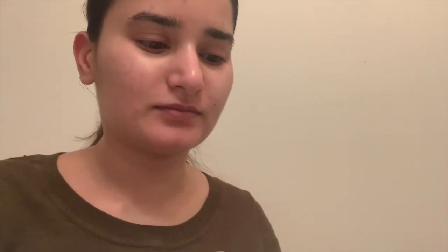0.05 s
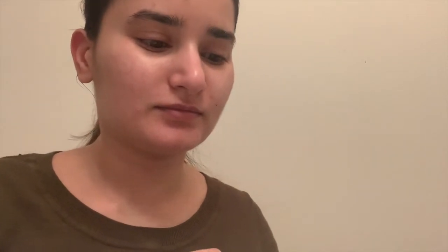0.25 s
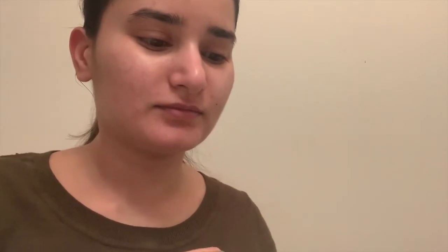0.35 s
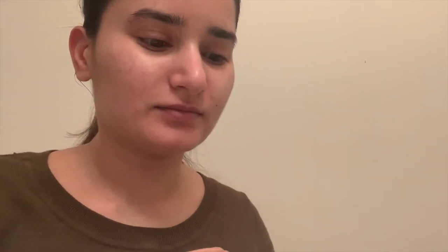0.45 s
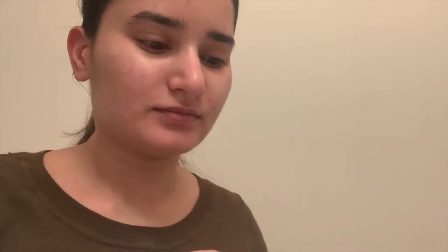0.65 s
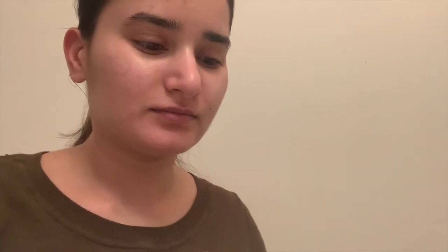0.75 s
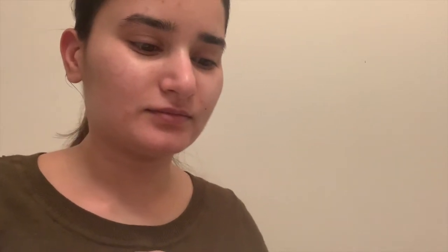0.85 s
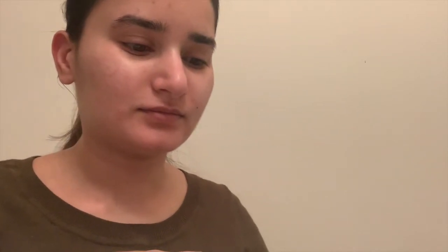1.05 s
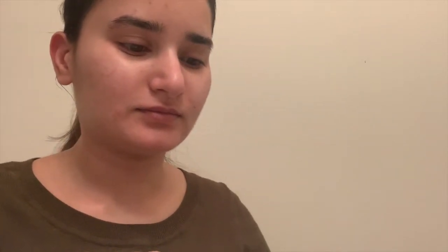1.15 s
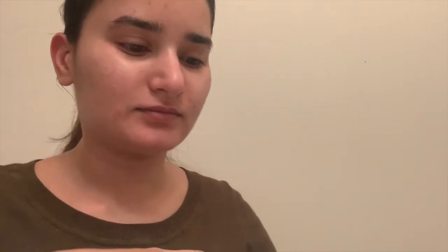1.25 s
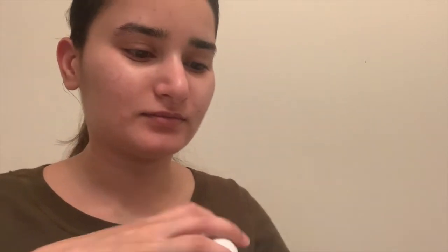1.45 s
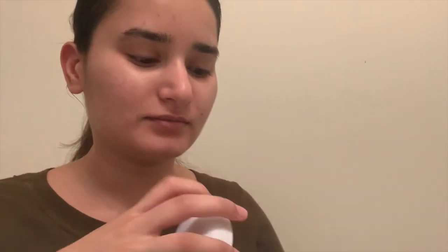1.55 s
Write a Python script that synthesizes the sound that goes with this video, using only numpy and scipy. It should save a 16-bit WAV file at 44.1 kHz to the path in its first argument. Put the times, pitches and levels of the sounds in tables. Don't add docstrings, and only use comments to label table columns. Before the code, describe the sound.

Small cosmetic jar handled close to the microphone: brief hard lid clacks with a short glassy ring, dull palm bumps, gritty thread scraping, then a light hand slide and weak taps, with faint room hiss.

```python
import sys
import numpy as np
from scipy import signal
from scipy.fft import rfft, irfft
from scipy.io import wavfile
rng = np.random.default_rng(int(sys.argv[2]) if len(sys.argv) > 2 else 0)


def amp(db):
    return 10 ** (np.asarray(db, float) / 20)


def write(x):
    x = np.atleast_2d(x).T
    wavfile.write(sys.argv[1], SR, np.round(np.clip(x, -1, 1) * 32767).astype(np.int16))

SR = 44100


N = 70560


def rms_one(x):
    return x / np.sqrt(np.mean(x ** 2) + 1e-20)


def in_time(rows):
    return amp(np.interp(np.arange(N) / SR, *np.transpose(rows)))


def colour(x, points):
    hz, db = np.transpose(points)
    bins_hz = np.arange(N // 2 + 1) * SR / N + 1
    gain = amp(np.interp(np.log(bins_hz), np.log(hz), db))
    return irfft(rfft(x) * gain, N)


def high_pass(x, hz, order):
    return signal.sosfilt(signal.butter(order, hz, "high", fs=SR, output="sos"), x)


def ring(x, hz, t60):
    r = amp(-60 / (t60 * SR))
    w = 2 * np.pi * hz / SR
    return signal.lfilter([0, np.sin(w)], [1, -2 * r * np.cos(w), r * r], x + 1e-18)


def resonance(x, hz, width_hz):
    r = np.exp(-np.pi * width_hz / SR)
    feedback = [1, -2 * r * np.cos(2 * np.pi * hz / SR), r * r]
    return signal.lfilter(np.array([1, 0, -1]) * (1 - r * r) / 2, feedback, x)


def grains(per_s, size_db):
    sizes = amp(size_db * np.minimum(rng.exponential(1, N), 5)) * rng.choice([-1, 1], N)
    return sizes * (rng.random(N) < per_s / SR)


def lid_knocks():
    knock_s = [.21, .2519, .252, .2522, .2928, .2944, .3163, .3162, .3172, .3163, .3185, .4623, .5056,
               .5108, .5112, .5116, .5119, .5124, .5122, .5134, .5151, .516, 1.156, 1.157, 1.165, 1.193,
               1.1931, 1.1931, 1.1933, 1.1933, 1.1935]
    # peak_db [dB], ring_hz [Hz], ring_t60_s [s], crack_db [dB]
    knock_rows = [(-44.5, 5100, 0.0093, -62.5), (-21.5, 1423, 0.0161, -31.5), (-26.5, 5400, 0.0135, -34),
                  (-27, 9520, 0.0085, -47.5), (-22.5, 1305, 0.024, -61.5), (-26.5, 1232, 0.0128, -61.5),
                  (-14, 1954, 0.0055, -29), (-16, 6040, 0.0071, -34.5), (-21.5, 5700, 0.0121, -46),
                  (-22.5, 14000, 0.0036, -46.5), (-17.5, 939, 0.0215, -47.5), (-33.5, 1184, 0.0235, -46.5),
                  (-20, 800, 0.0101, -27), (-19.5, 2310, 0.0052, -38.5), (-23.5, 5450, 0.013, -55.5),
                  (-6.5, 1954, .006, -29.5), (-12.5, 1335, 0.00358, -50.5), (-20.5, 4114, 0.00614, -35),
                  (-27.5, 715, 0.0079, -41), (-16, 1149, 0.0131, -25.5), (-16.5, 1227, 0.0125, -46.5),
                  (-12.5, 1360, 0.0063, -57), (-31, 1220, 0.0079, -42), (-35, 668, 0.0082, -54),
                  (-40.5, 4960, 0.0102, -62.5), (-28, 5412, 0.0118, -50.5), (-43, 4870, 0.0061, -55.5),
                  (-31, 3416, 0.0082, -55.5), (-33.5, 754, 0.0042, -52), (-29, 860, 0.0062, -61.5),
                  (-22.5, 1302, 0.0124, -44.5)]
    # pitch_hz [Hz], level_db [dB]
    crack_colour = [(600, 5), (2000, 6), (3500, 2), (5700, -6), (7500, -8.5), (10000, -10.5), (15500, -14)]
    crack_rise_s, crack_t60_s = 0.0002, 0.0183
    t = np.arange(N) / SR
    rings, crack = np.zeros(N), np.zeros(N)
    for s, (db, hz, t60, crack_db) in zip(knock_s, knock_rows):
        push_s = max(0.2 / hz, 1 / SR)
        push = np.maximum(1 - np.abs(t - s) / push_s, 0)
        rings += ring(amp(db) / (push_s * SR) * push, hz, t60)
        rise = np.clip((t - s) / crack_rise_s + 1, 0, 1)
        crack += rise * amp(crack_db - 60 * np.maximum(t - s, 0) / crack_t60_s)
    return rings + crack * rms_one(colour(rng.standard_normal(N), crack_colour))


def jar_ringing():
    strike_s = [.2528, .3164, .5115, 1.193]
    # level_db [dB], treble_tilt_db [dB per 5 kHz], wall_modes_db [dB]
    strike_rows = [
        (-33.5, 8, -17),
        (-34, -1, -1.5),
        (-21.5, -7.5, -1.5),
        (-48, 16.5, -13.5),
    ]
    # pitch_hz [Hz], level_db [dB], t60_s [s]
    jar_modes = [(708.2, -17.5, 0.11), (1088.4, -12.5, 0.34), (1131, -17, 0.051), (1224, -18.5, 0.055),
                 (1281.3, -15, 0.16), (2170, -44, 0.052), (2508.2, -5.5, 0.0279), (3331, -7.5, 0.047),
                 (3372, -13, 0.18), (3490, -7, 0.057), (4774, -14.5, 0.095), (5560, -17, 0.016),
                 (5630, -16, 0.0097)]
    chatter_db, chatter_t60_s, chatter_knee_hz = -20, 0.3, 2500
    held_t60_s, wall_from_hz, spread_db = 0.08, 3000, -1.5
    t = np.arange(N) / SR
    out = np.zeros(N)
    spread = rng.standard_normal((len(strike_rows), len(jar_modes)))
    for s, (db, tilt_db, wall_db), chances in zip(strike_s, strike_rows, spread):
        click = np.maximum(1 - np.abs(t - s) * SR, 0)
        for (hz, mode_db, t60), chance in zip(jar_modes, chances):
            haste = max(hz / chatter_knee_hz + 0.31, 1)
            fade = amp(chatter_db - 60 * np.abs(t - s) / chatter_t60_s * haste)
            chatter = rng.standard_normal(N) * (t > s) * fade
            level_db = db + mode_db + spread_db * chance + tilt_db * hz / 5000
            level_db += wall_db * (hz > wall_from_hz)
            out += amp(level_db) * ring(click + chatter, hz, min(t60, held_t60_s))
    return out


def knocks():
    return high_pass(lid_knocks() + jar_ringing(), 420, 3)


def lid_scrape():
    # time_s [s], level_db [dB]
    scrape_level = [(0, -105), (.06, -65), (.1, -53.5), (.17, -46), (.215, -50.5), (.29, -41.5), (.39, -42),
                    (.47, -47.5), (.6, -41.5), (.7, -55.5), (.8, -56.5), (.96, -51), (1.04, -54),
                    (1.15, -53), (1.162, -46.5), (1.25, -64.5), (1.31, -65.5), (1.6, -67)]
    # pitch_hz [Hz], width_hz [Hz], level_db [dB]
    lid_modes = [(564, 127, -4), (754.6, 286, -5), (953.3, 172, 1.5), (1115, 186.4, 3),
                 (1414.5, 124.8, 4.5), (1651, 207, -3), (1988, 298, -3.5), (2529, 277, -6), (3202, 77, -13)]
    # time_s [s], level_db [dB]
    rim_level = [(0, -7.5), (.19, -3.5), (.3, 2.5), (.7, -11.5), (.95, 3), (1.3, 2.5)]
    # time_s [s], level_db [dB]
    muffle_level = [(0, -1.5), (.12, -1.5), (.2, -1), (.3, 3), (.45, 3), (.7, 4.5), (.8, 1.5), (.9, 4.5),
                    (.97, -9), (1.13, -6), (1.17, -6), (1.3, -8.5)]
    # time_s [s], level_db [dB]
    hollow_level = [(0, 2.5), (.2, -8), (.26, 0), (.9, -2.5), (1, 2), (1.13, -2), (1.3, 12.5), (1.4, 2)]
    muffle_hz = (800, 1300)
    rim_from_hz = 1700
    slips = grains(2500, 2.5)
    lid = np.zeros(N)
    for k, (hz, width_hz, db) in enumerate(lid_modes):
        mode = amp(db) * (-1) ** k * resonance(slips, hz, width_hz)
        if hz > rim_from_hz:
            mode = mode * in_time(rim_level)
        if muffle_hz[0] < hz < muffle_hz[1]:
            mode = mode * in_time(muffle_level)
        if hz < muffle_hz[0]:
            mode = mode * in_time(hollow_level)
        lid += mode
    return in_time(scrape_level) * rms_one(lid)


def bumps():
    # start_s [s], level_db [dB], pitch_hz [Hz], swell_s [s], t60_s [s]
    bump_rows = [(0.23, -30.5, 217, 0.00502, 0.0101), (0.234, -31, 461.5, 0.00474, 0.018),
                 (.236, -29, 280.2, 0.00777, 0.0084), (0.253, -25, 398.4, 0.0044, 0.067),
                 (.256, -23, 244.5, 0.00942, 0.0154), (.283, -35, 193.4, 0.00705, 0.022),
                 (0.4908, -23.5, 182.7, 0.01175, 0.0211), (0.494, -26, 77.2, 0.00548, 0.2345),
                 (0.517, -28, 200, 0.0056, 0.0436), (.57, -31.5, 83.6, 0.0156, 0.059),
                 (0.244, -40.5, 86.8, 0.024, 0.25), (.3, -50.5, 76, 0.0157, 0.115),
                 (0.371, -48.5, 85.4, 0.0146, 0.074), (0.453, -38.5, 252, 0.0183, 0.041),
                 (.765, -46.5, 436, 0.0253, 0.075), (0.801, -55.5, 457, 0.0155, 0.07),
                 (0.799, -50, 223.6, 0.0099, 0.0256), (0.799, -46, 340.3, 0.0123, 0.033),
                 (.5, -32, 343.9, 0.00666, 0.06), (.33, -39, 340.6, 0.0138, 0.235),
                 (1.145, -47, 439.6, 0.033, 0.12), (1.18, -44, 439.2, 0.0153, 0.04)]
    out = np.zeros(N)
    for s, db, hz, swell_s, t60 in bump_rows:
        t = np.maximum(np.arange(N) / SR - s, 0)
        swell = np.sin(np.pi / 2 * np.minimum(t / swell_s, 1)) ** 2
        fade = amp(db - 60 * np.maximum(t - swell_s, 0) / t60)
        out += swell * fade * np.sin(2 * np.pi * hz * t)
    return out


def palm_rumble():
    # time_s [s], level_db [dB]
    grip_level = [(0, -74.5), (.14, -58), (.2, -80.5), (.24, -38.5), (.4, -49), (.44, -49.5), (.48, -41),
                  (.6, -45.5), (.66, -60.5), (.75, -54.5), (.8, -52.5), (.86, -68), (1.1, -56),
                  (1.18, -61.5), (1.27, -57.5), (1.32, -70.5), (1.6, -70)]
    hz, width_hz = 299.4, 678
    grip = resonance(resonance(rng.standard_normal(N), hz, width_hz), hz, width_hz)
    return in_time(grip_level) * rms_one(grip)


def skin_slide():
    # time_s [s], level_db [dB]
    slide_level = [(0, -61.5), (.08, -68.5), (.2, -66), (.245, -51.5), (.35, -54.5), (.44, -59),
                   (.58, -48.5), (.65, -65.5), (.75, -51.5), (.81, -44), (.86, -47), (.91, -46.5),
                   (.97, -60), (1.04, -67), (1.14, -61.5), (1.2, -54.5), (1.26, -58.5), (1.31, -91.5)]
    # pitch_hz [Hz], level_db [dB per Hz]
    skin_colour = [(300, -3), (1200, -2.5), (2000, -4), (3000, 0.5), (4200, -1.5), (6500, 0), (10000, -0.5),
                   (15500, 4)]
    skin = rms_one(colour(grains(12000, 2), skin_colour))
    press = in_time(slide_level)
    edge = high_pass(skin, 4040, 2)
    skin = skin + edge * (press / amp(-46) - 1)
    return amp(11.5) * press * skin


def friction():
    return palm_rumble() + lid_scrape() + skin_slide()


def room(x):
    t60_s, gap_s = 0.2723, 0.00409
    t = np.arange(SR // 2) / SR
    fade = amp(-60 * t / t60_s) * np.clip(t / gap_s - 0.5, 0, 1)
    tail = rng.standard_normal((2, len(t))) * fade
    tail = signal.sosfilt(signal.butter(1, [110, 7880], "band", fs=SR, output="sos"), tail)
    tail = rms_one(tail) / np.sqrt(len(t))
    return amp(-8.5) * signal.fftconvolve(x[None], tail, axes=1)[:, :N]


def air():
    # pitch_hz [Hz], level_db [dB per Hz]
    air_colour = [(25, -9.5), (60, -7), (150, -7.5), (400, -16), (1200, -22), (3000, -23), (6000, -28),
                  (15500, -17.5)]
    # time_s [s], level_db [dB]
    boom_level = [(0, -0.5), (.15, 3.5), (.45, 7.5), (.62, 3.5), (.66, -0.5), (.72, 3), (1.1, 1.5),
                  (1.2, -2), (1.3, 3.5), (1.45, -0.5), (1.6, -2.5)]
    boom_hz, alike = 71.47, 0.478
    shared, *own = rng.standard_normal((3, 2 * N))
    boom = resonance(alike * shared + (1 - alike) * np.array(own), boom_hz, 4.94)
    boom = resonance(boom, boom_hz, 40)[:, N:]
    hiss = rms_one(colour(rng.standard_normal((2, N)), air_colour))
    return amp(-54.5) * hiss + amp(-59) * in_time(boom_level) * rms_one(boom)


def scene():
    hits, low, rub = knocks(), bumps(), friction()
    turn = 0.2129 * np.minimum(np.arange(N // 2 + 1) * SR / N / 440, 1)
    phase = np.exp(1j * np.pi * turn * np.array([[-1], [1]]))
    direct = irfft(rfft(hits + low + 0.8496 * rub) * phase, N)
    echo = room(hits + 1.653 * low + 0.433 * rub)
    shared_echo = 0.262 * room(low)[0]
    own_rub = amp(-3) * np.array([friction(), friction()])
    return direct + echo + shared_echo + air() + own_rub


def roll_off(x):
    return signal.sosfilt(signal.butter(12, 16510, fs=SR, output="sos"), x)


def record(dry):
    # pitch_hz [Hz], level_db [dB]
    sum_colour = [(60, 5), (750, 4.5), (1700, 3), (6000, 3.5), (7500, -2), (8250, -10), (9900, -20),
                  (10600, -4), (12500, -4)]
    # pitch_hz [Hz], level_db [dB]
    diff_colour = [(60, 3), (160, 6), (450, 2), (800, 9), (1700, 0.02), (6000, 5.5), (10500, 3),
                   (12300, -9), (15500, -28)]
    duck_from_db, duck_slope, duck_s, back_db_per_s = -44, 0.1843, 0.03, 41.5
    mid = colour(dry[0] + dry[1], sum_colour) / 2
    side = colour(dry[0] - dry[1], diff_colour) / 2
    balance = amp(np.array([[0.5], [-0.5]]) * -1.16)
    x = np.array([mid + side, mid - side]) * balance
    r = np.exp(-1 / (duck_s * SR))
    power = signal.lfilter([1 - r], [1, -r], np.mean(x ** 2, axis=0))
    level_db = 10 * np.log10(power + 1e-12)
    ramp = back_db_per_s * np.arange(N) / SR
    level_db = np.maximum.accumulate(level_db + ramp) - ramp
    x = x * amp(-duck_slope * np.maximum(level_db - duck_from_db, 0))
    x = signal.sosfilt(signal.cheby2(12, 60, 16300, fs=SR, output="sos"), x)
    x = high_pass(x, 16.7, 2)
    return roll_off(x)


dry = scene()
out = record(dry)
write(out)
```